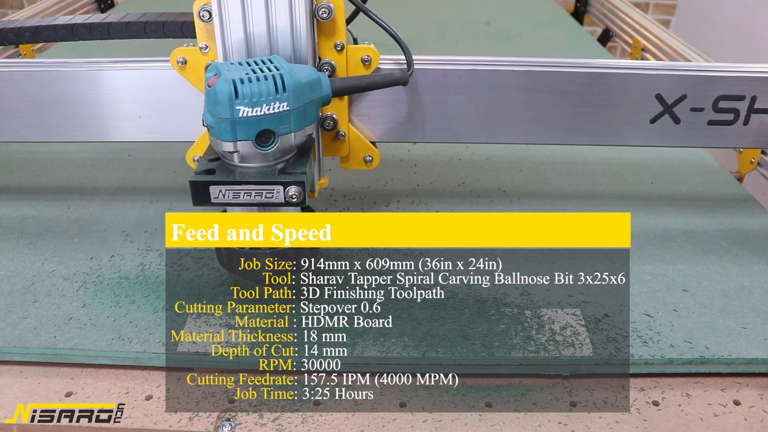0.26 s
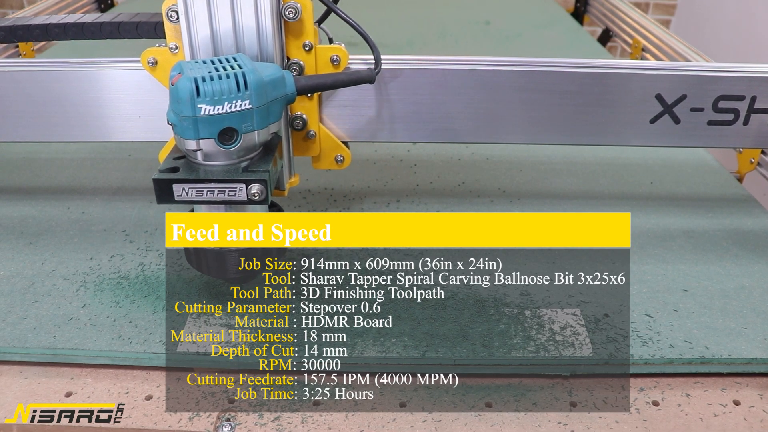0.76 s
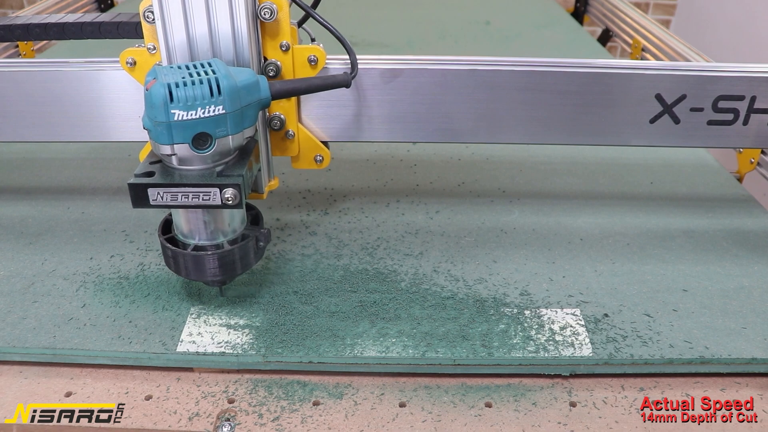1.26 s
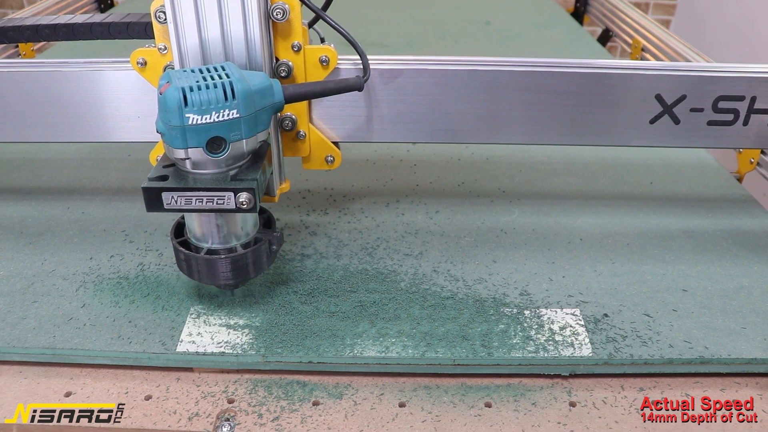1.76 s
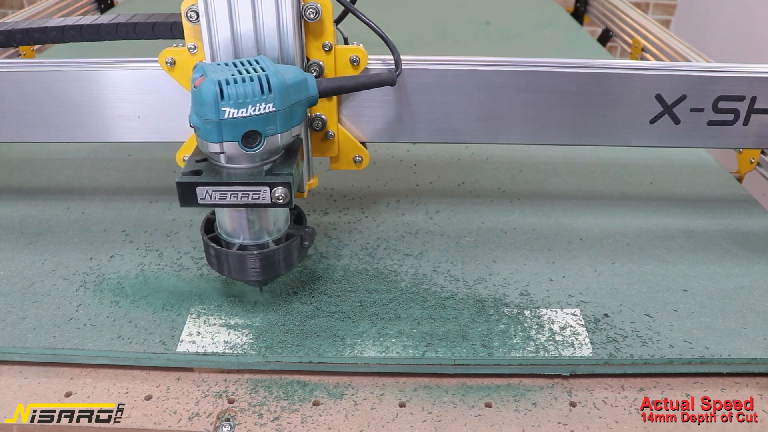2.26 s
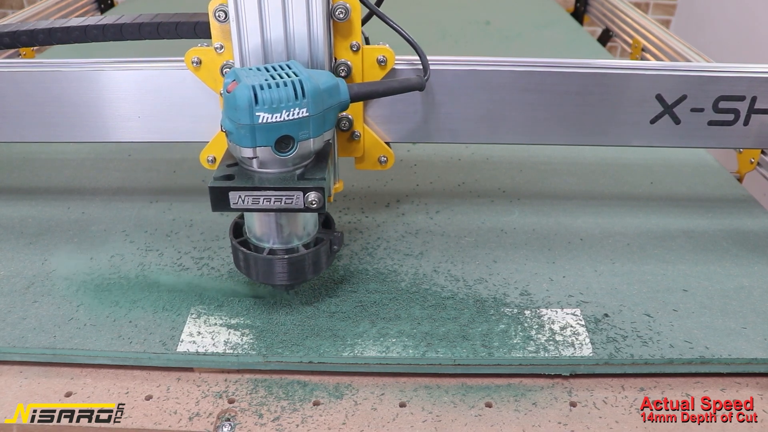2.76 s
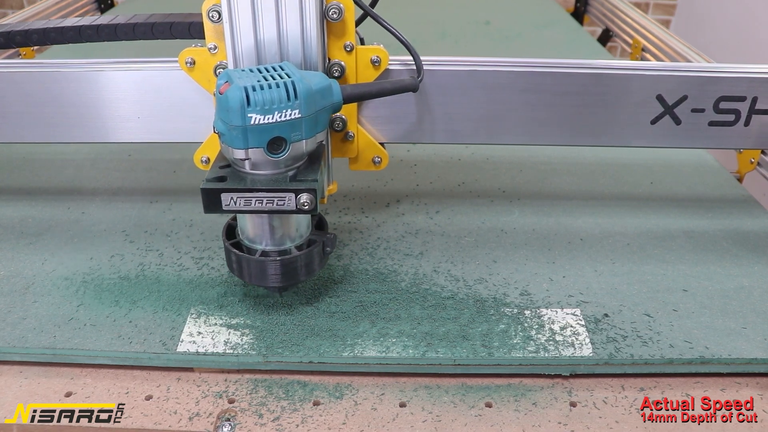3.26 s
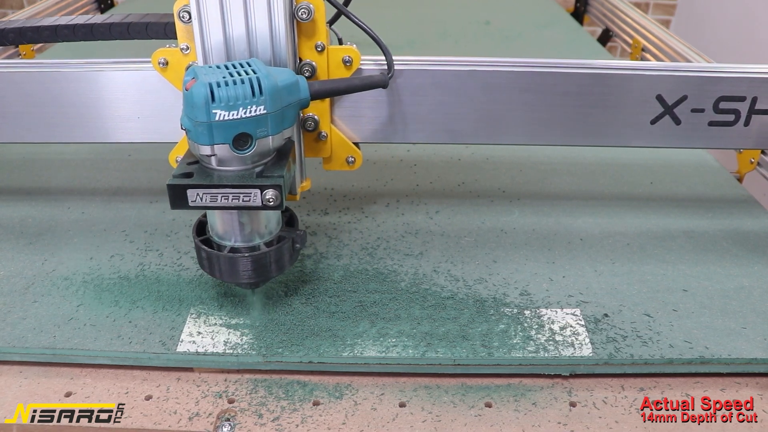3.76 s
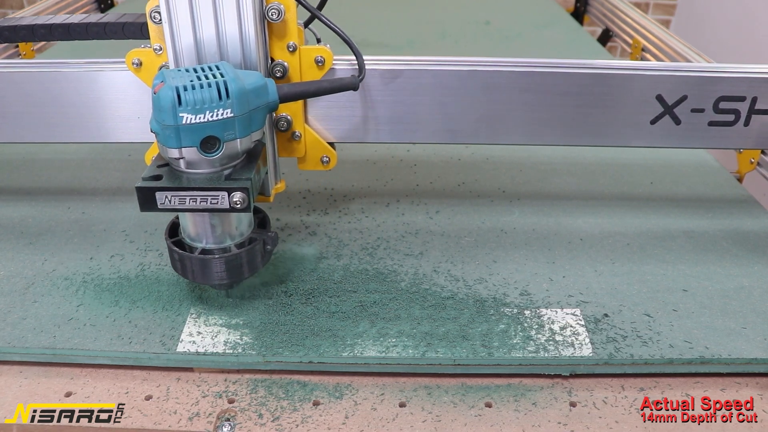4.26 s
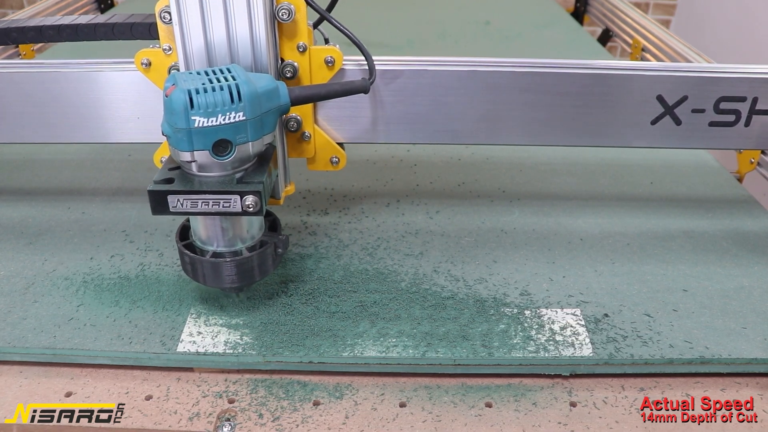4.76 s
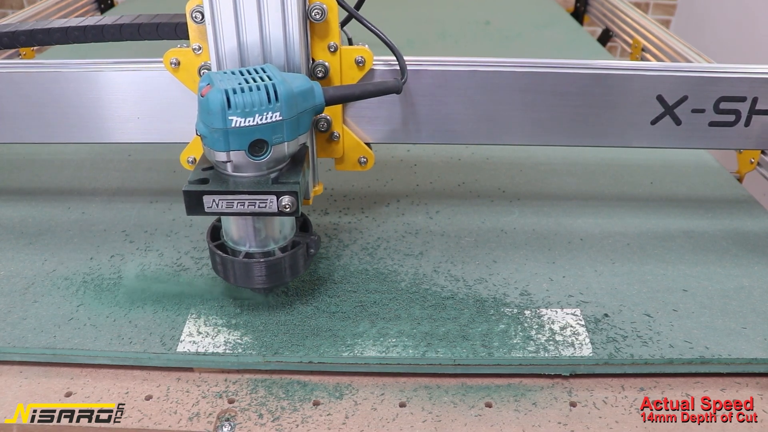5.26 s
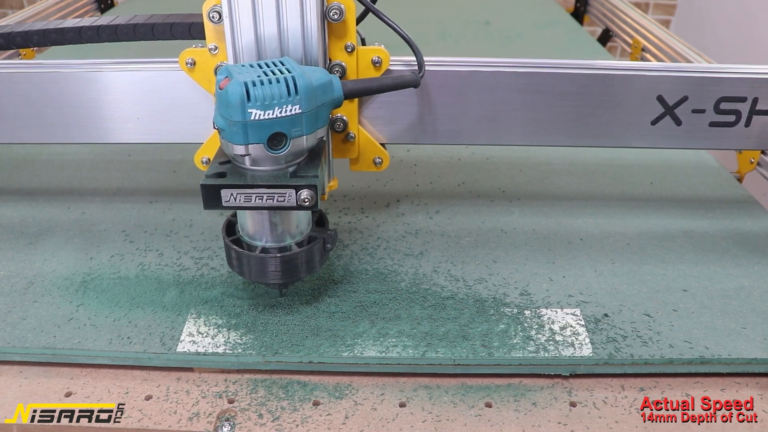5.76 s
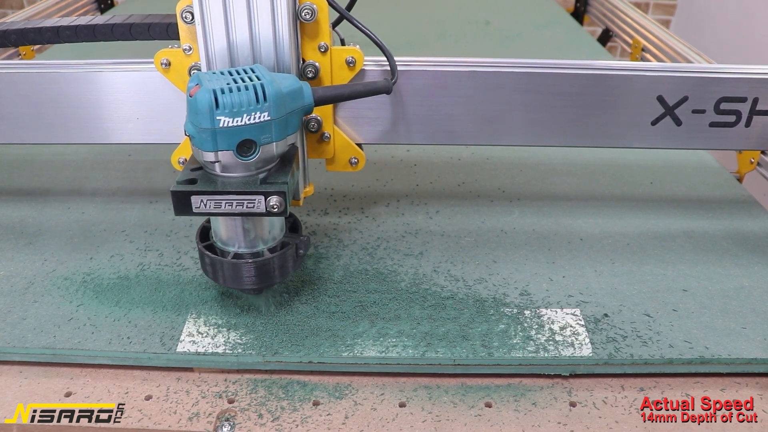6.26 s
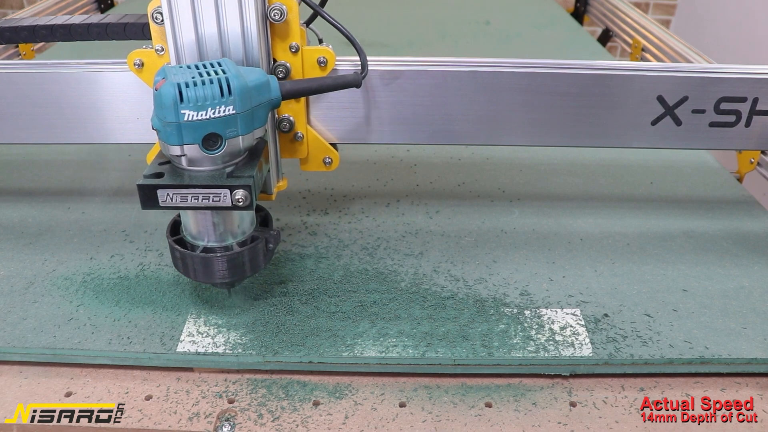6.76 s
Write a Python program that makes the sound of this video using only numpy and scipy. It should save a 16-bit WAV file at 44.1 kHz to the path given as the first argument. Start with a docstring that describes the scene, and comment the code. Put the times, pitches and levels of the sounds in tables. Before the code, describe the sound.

A small electric router on a gantry is already at full speed at 0 s, carving fibreboard continuously until the end at about 7 s. The dominant sound is a steady, hard whine built on a buzzing tone near 490 Hz with strong overtones, slightly rough and fluttering. Its pitch wavers by a few percent: rising around 1.3 s, dipping near 3.4 s, lifting around 4.4 s, sagging near 6.3 s and peaking again about 6.7 s. Separate overtones swell and fade quickly and wander across the stereo image, as reflections change in the hard-walled workshop. Underneath is an unbroken rush of fan air and a bright, grainy hiss of chips, a little stronger near 0.2, 3.9 and 6.5 s, weaker near 1.5 and 4.7 s. Very faint low frame rumble shudders occasionally, and a barely perceptible lower hum comes and goes. Close pickup, no pause or stop.

```python
"""Trim router on a gantry

A trim router on a gantry carves a relief in fibreboard in a hard-walled workshop.
The spindle whines on multiples (orders) of its turning rate, which sags under load; each order swells and
fades as the moving tool shifts through the room's reflections. Filtered noise makes the hiss of fan air and
chips and a faint gantry rumble; a weak tone at half the turning rate comes and goes."""
import sys
import numpy as np
from scipy import signal
from scipy.fft import rfft, irfft, next_fast_len
from scipy.io import wavfile

SR = 44100
rng = np.random.default_rng(int(sys.argv[2]) if len(sys.argv) > 2 else 0)


def master_out(mix):
    """Clip the mix to full scale and print it as 16-bit PCM to the path in sys.argv[1]."""
    frames = np.transpose(np.atleast_2d(mix))
    ceiling = np.clip(frames, -1, 1)
    pcm = np.round(ceiling * 32767).astype(np.int16)
    wavfile.write(sys.argv[1], SR, pcm)


N = 309141

PORT_LAG_S = 4.5e-5   # delay at the right port of the sound both ports share

# Spindle orders with listed swells. Each row: multiple of the turning rate, level in dB of the part
# opposite in sign at the two ports (before its scatter), flutter depth as a fraction of the amplitude.
SIDE_ORDERS = [(1, -65.5, 0.18), (2, -54, 0.27), (3, -54.5, 0.33), (4, -57, 0.58), (5, -52, 0.51),
               (6, -53, 0.68), (8, -54, 0.39), (7, -58, 0.63), (10, -66, 0.77), (11, -65, 0.5),
               (12, -55.5, 0.79)]


def from_db(db):
    """Decibels are logarithmic: 20 dB is a tenfold amplitude."""
    return 10 ** (np.asarray(db) / 20)


def rms_one(x):
    """Mean power sets level: scales a signal to an rms of 1."""
    return x / np.sqrt(np.mean(np.abs(x) ** 2) + 1e-20)


def in_time(rows):
    """Linear interpolation in time: the columns of a table, one value a sample."""
    s, *columns = np.transpose(rows)
    return [np.interp(np.arange(N) / SR, s, column) for column in columns]


def at_hz(points, hz):
    """Pitch is logarithmic in frequency: reads a spectrum on a log-frequency axis."""
    point_hz, values = np.array(points).T
    return np.interp(np.log(hz), np.log(point_hz), values)


def bump(at_s, spread_s):
    """Gaussian pulse: a smooth rise and fall around one moment, height 1, standard deviation spread_s."""
    t = np.arange(N) / SR
    return np.exp(-.5 * ((t - at_s) / spread_s) ** 2)


def drift(rate_hz):
    """Low-passed noise wanders slowly: two equal poles at rate_hz, rms 1."""
    step = 40                                  # samples between coarse values
    pole = np.exp(-2 * np.pi * rate_hz * step / SR)
    coarse = rng.standard_normal(N // step + 2002)
    slow = signal.lfilter([1], [1, -2 * pole, pole * pole], coarse)[2000:]   # drop the run-in
    return np.interp(np.arange(N) / step, np.arange(len(slow)), rms_one(slow))


def scatter(rate_hz):
    """The sum of many reflections is complex Gaussian: a wandering strength and phase, power 1."""
    return (drift(rate_hz) + 1j * drift(rate_hz)) / np.sqrt(2)


def hiss(spectrum, patchy_db, flicker_hz):
    """Partial coherence: noise partly shared by the two ports, flickering in octave bands; rms 1."""
    # Each row: frequency in Hz, share of the noise power common to both ports, 0 to 1.
    likeness = [(60, 0.98), (500, 1), (680, 0.75), (1300, 0.77), (1800, 0.31), (3100, 0.49), (7000, 0.42),
                (15000, 0.32)]
    size = next_fast_len(N)
    hz = np.maximum(np.arange(size // 2 + 1) * SR / size, 1)
    shared, left, right = rfft(rng.standard_normal((3, size)))
    alike = np.clip(at_hz(likeness, hz), 0, 1)
    late = shared * np.exp(-2j * np.pi * hz * PORT_LAG_S)
    common = np.sqrt(alike) * np.array([shared, late])
    separate = np.sqrt(1 - alike) * np.array([left, right])
    pair = (common + separate) * from_db(at_hz(spectrum, hz))

    out = 0
    together = drift(flicker_hz)
    for octave in range(4, 15):
        share = np.clip(1 - np.abs(np.log2(hz) - octave), 0, 1)   # overlapping bands that add up to one
        band = irfft(pair * share, size)[:, :N]
        flicker_db = patchy_db * (0.77 * together + drift(flicker_hz))
        out = out + band * from_db(flicker_db)
    return rms_one(out)


def turning_angle():
    """Phase is the running integral of rate: the spindle's angle in radians as it sags and runs up."""
    # Spindle speed, sagging under load and rising when the cut eases.
    # Each row: time in seconds, speed in turns per second.
    spindle = [(0.0, 482), (0.03, 482.7), (0.11, 488.4), (0.31, 493.5), (0.8, 491), (1.16, 486.5),
               (1.27, 495.8), (1.32, 497.6), (1.45, 496.7), (1.61, 491.9), (1.9, 489.8), (2.14, 493),
               (2.64, 490.6), (2.91, 496.5), (3.13, 490.6), (3.24, 490.4), (3.41, 482.2), (3.44, 482.8),
               (3.5, 487.5), (3.73, 493.1), (4.18, 486.9), (4.22, 488.3), (4.36, 498.3), (4.4, 499),
               (4.53, 496.7), (4.69, 491.5), (4.83, 493.1), (4.96, 488.9), (5.16, 491.7), (5.38, 491.9),
               (5.61, 496.6), (5.8, 490.9), (6.01, 491.7), (6.26, 482.2), (6.61, 492.9), (6.72, 499.6),
               (6.88, 494.3), (7.01, 494.8)]
    speed, = in_time(spindle)
    return 2 * np.pi * np.cumsum(speed + 0.25 * drift(13.6)) / SR


def order_levels():
    """Interference varies level: each order with listed swells wanders about its usual dB, swells or fades."""
    # Usual level of each of these orders before its wander, in dB rms, in the sequence of SIDE_ORDERS.
    usual_levels = [-48, -48, -45, -49.5, -53.5, -55.5, -58, -60, -61.5, -69, -62]
    # Passing swells and fades of one order. Each row: centre in seconds, multiple of the turning rate,
    # standard deviation of the pulse in seconds, change at its centre in dB.
    swells = [(0.0, 2, 0.07, -5), (0.04, 1, 0.033, -8.5), (0.09, 4, 0.015, -12), (0.133, 7, 0.12, 6.8),
              (0.306, 2, 0.022, -16), (0.307, 11, 0.115, 13), (0.334, 4, 0.052, 4.5), (0.45, 12, 0.118, 8),
              (0.533, 4, 0.22, 3.5), (0.6, 8, 0.29, 4.5), (0.642, 12, 0.087, -3), (0.668, 1, 0.21, -5.5),
              (0.675, 4, 0.03, -16), (0.766, 6, 0.16, -9), (0.775, 11, 0.073, 8), (0.808, 3, 0.075, -10),
              (0.818, 5, 0.036, 7.5), (0.9, 10, 0.266, 3.5), (0.946, 3, 0.035, 4.0), (0.995, 4, 0.077, 5.5),
              (0.998, 7, 0.076, -11), (1.171, 8, 0.14, -9), (1.183, 3, 0.013, -10.0),
              (1.187, 2, 0.0091, -4), (1.2, 5, 0.057, 3.5), (1.206, 1, 0.028, 2.5), (1.27, 3, 0.1, -12.5),
              (1.275, 2, 0.0073, -7), (1.436, 11, 0.035, 15), (1.456, 5, 0.2, 4), (1.465, 1, 0.034, -7.9),
              (1.469, 3, 0.054, 7), (1.549, 11, 0.094, -5.0), (1.597, 4, 0.089, -8), (1.62, 1, 0.16, 1.5),
              (1.63, 8, 0.023, 9), (1.672, 2, 0.013, -24), (1.693, 12, 0.042, -12), (1.767, 8, 0.028, 11),
              (1.783, 12, 0.053, 6), (1.8, 11, 0.032, 6), (2.03, 7, 0.024, 7), (2.069, 4, 0.047, -6.0),
              (2.158, 7, 0.467, -8), (2.168, 10, 0.056, -1), (2.218, 11, 0.058, 4), (2.221, 4, 0.058, 5.7),
              (2.224, 3, 0.077, 5), (2.338, 5, 0.217, -8), (2.39, 6, 0.1, 7), (2.403, 11, 0.049, -6),
              (2.5, 11, 0.029, 10), (2.57, 6, 0.059, -8), (2.585, 2, 0.11, 6.5), (2.593, 10, 0.12, -5),
              (2.65, 1, 0.29, 2), (2.671, 4, 0.48, -7), (2.774, 5, 0.029, -9.4), (2.869, 2, 0.055, -12),
              (2.903, 12, 0.029, -9), (2.916, 5, 0.093, 7.5), (2.943, 6, 0.041, -10),
              (2.951, 10, 0.029, -7.7), (2.997, 1, 0.053, -5), (3.077, 12, 0.058, 10),
              (3.087, 3, 0.23, 3.5), (3.153, 11, 0.048, -7.7), (3.18, 12, 0.045, -9.2),
              (3.187, 2, 0.081, 4.4), (3.191, 8, 0.074, 11.3), (3.256, 6, 0.046, -9), (3.27, 7, 0.108, -10),
              (3.3, 4, 0.032, 10.5), (3.324, 2, 0.036, -13), (3.343, 7, 0.036, 9), (3.417, 1, 0.34, -4.5),
              (3.426, 3, 0.0096, -10.8), (3.56, 7, 0.37, 6), (3.618, 6, 0.15, 6.7), (3.727, 11, 0.02, 9),
              (3.754, 4, 0.048, 6.3), (3.769, 8, 0.061, -7.9), (3.801, 11, 0.192, -9),
              (3.838, 10, 0.027, 5), (3.84, 12, 0.028, -7.1), (3.9, 4, 0.09, -9), (3.947, 8, 0.026, 8),
              (4.0, 7, 0.084, -10), (4.075, 4, 0.033, 5.5), (4.093, 3, 0.21, -6), (4.137, 6, 0.034, -11),
              (4.196, 8, 0.034, -12), (4.239, 2, 0.014, -9.1), (4.32, 2, 0.009, -15), (4.39, 3, 0.07, -6),
              (4.394, 11, 0.036, 16), (4.426, 10, 0.019, 9.3), (4.44, 5, 0.31, 4), (4.544, 1, 0.034, -10),
              (4.554, 3, 0.1, 5.5), (4.606, 4, 0.066, -14), (4.696, 11, 0.102, -9),
              (4.775, 3, 0.021, -10.5), (4.783, 2, 0.034, -15), (4.995, 5, 0.12, -10), (5.103, 4, 0.033, 8),
              (5.19, 2, 0.83, 2), (5.187, 3, 0.016, -8.0), (5.2, 7, 0.329, -7), (5.27, 6, 0.096, 4.5),
              (5.338, 11, 0.13, 13), (5.353, 10, 0.27, -7), (5.38, 1, 0.16, 4.5), (5.4, 4, 0.47, -8),
              (5.563, 2, 0.1, -11), (5.647, 12, 0.045, -16), (5.684, 3, 0.17, 3.2), (5.69, 5, 0.2, 7),
              (5.721, 8, 0.072, -12), (5.918, 11, 0.08, 11), (5.933, 8, 0.2, 8), (5.956, 2, 0.105, 5),
              (5.97, 12, 0.32, 8.9), (5.997, 7, 0.076, -10), (6.007, 12, 0.088, -10.9), (6.07, 5, 0.1, -12),
              (6.117, 3, 0.026, 11), (6.122, 2, 0.018, -22), (6.14, 11, 0.02, 9), (6.256, 1, 0.013, -8.0),
              (6.263, 4, 0.066, 4.6), (6.305, 3, 0.122, -4.5), (6.32, 7, 0.252, 5), (6.346, 1, 0.142, -10),
              (6.38, 2, 0.015, -11), (6.45, 2, 0.27, -4.5), (6.595, 2, 0.042, -13), (6.63, 1, 0.15, 4.1),
              (6.694, 3, 0.1, -7.5), (6.747, 12, 0.072, -7.6), (6.773, 2, 0.042, 6.5),
              (6.82, 5, 0.032, 8.8), (6.87, 1, 0.021, -20), (6.931, 4, 0.053, -19)]
    levels = []
    for usual_db, (k, *_) in zip(usual_levels, SIDE_ORDERS):
        moments_db = sum(db * bump(s, spread_s) for s, order, spread_s, db in swells if order == k)
        wander_db = 1.0 * drift(13.2 * np.sqrt(k))   # faster for higher multiples
        levels.append(usual_db + moments_db + wander_db)
    return levels


def whine(turn, levels_db):
    """Periodic forcing: unbalance, flutes and fan blades give sines on multiples of the turning angle."""
    # Further orders, without listed swells: their level and phase wander at random.
    # Each row: multiple of the turning rate, level in dB before roughness and reflections scale it.
    further_orders = [(9, -64), (13, -60), (14, -61.5), (15, -73), (16, -71), (17, -67), (18, -71.5),
                      (20, -72)]
    out = np.zeros((2, N))
    for level_db, (k, side_db, flutter) in zip(levels_db, SIDE_ORDERS):
        path = rng.uniform(0, 2 * np.pi) + 0.74 * drift(0.31 * k)   # the changing path shifts the phase
        wave = np.sqrt(2) * np.exp(1j * (k * turn + path))
        chatter = 1 + flutter * scatter(6.8 * np.sqrt(k))           # the uneven bite roughens the tone
        side = from_db(side_db) * (.3j + scatter(0.64 * k))
        ports = from_db(level_db) + side * [[1], [-1]]
        out += np.real(wave * chatter * ports)

    for k, level_db in further_orders:
        wave = np.sqrt(2) * from_db(level_db) * np.exp(1j * k * turn)
        wave = wave * (1 + 0.5 * scatter(26.0))
        rate_hz = 0.42 * k   # short waves pass through the reflection pattern faster
        shared = 0.34 * (0.6 + scatter(rate_hz))
        late = np.exp(-2j * np.pi * k * 491 * PORT_LAG_S)   # lag as phase at 491 turns per second
        out[0] += np.real(wave * (shared + 0.77 * scatter(rate_hz)))
        out[1] += np.real(wave * (shared * late + 1.0 * scatter(rate_hz)))
    return out


def fan_air():
    """Turbulence is broadband: the fan's air is shaped noise with flickering bands."""
    # Each row: frequency in Hz, relative spectral level in dB per Hz.
    air_spectrum = [(25, -46), (120, -34.5), (250, -27.5), (400, -20), (620, -13), (900, -2.5), (1250, -9),
                    (1650, -3.5), (2050, 1.5), (3200, -5), (3800, -4), (5000, -10), (8000, -20.5),
                    (15700, -27)]
    return from_db(-43.5) * hiss(air_spectrum, patchy_db=0.99, flicker_hz=8.6)


def cutting(turn):
    """Amplitude modulation: chips tear off once a turn, and the motor's mains ripple shakes the bite."""
    # Depth of bite. Each row: time in seconds, cutting level in dB before the 6.5 dB lift below.
    bite = [(0.0, -51.5), (0.21, -47.5), (0.3, -51.5), (0.76, -49.5), (0.9, -49.5), (1.03, -53.5),
            (1.42, -51.5), (1.52, -57), (1.87, -49.5), (2.3, -50.5), (2.62, -53), (3.28, -53), (3.9, -49),
            (4.14, -52.5), (4.26, -50.5), (4.74, -57.5), (4.86, -51.5), (5.4, -52), (6.13, -54.5),
            (6.48, -47), (6.56, -51), (6.8, -49.5), (7.01, -55)]
    # Each row: frequency in Hz, relative spectral level in dB per Hz.
    chips = [(300, -34), (1000, -6.5), (3000, -7), (6000, -2), (8000, -5), (10000, -11), (12000, -17),
             (15700, -21)]
    bite_db, = in_time(bite)
    ripple = 0.06 * np.sin(2 * np.pi * 100 * np.arange(N) / SR)   # 100 Hz
    pulse = 1 + 0.06 * np.cos(turn) + ripple
    return from_db(bite_db + 6.5) * pulse * hiss(chips, patchy_db=0.97, flicker_hz=11.0)


def gantry_rumble():
    """Structural resonance favours low bands: the frame rumbles as it feeds, and shudders at moments."""
    # Each row: frequency in Hz, relative spectral level in dB per Hz.
    rumble = [(25, -25), (90, -9), (112, 4), (140, -10), (175, 4), (210, -5), (400, -45)]
    # Each row: centre in seconds, change at the centre from the steady rumble in dB.
    shudders = [(1.35, 7), (1.74, 4), (2.99, 9), (4.5, 6), (4.84, 7.5), (5.72, 9), (6.6, -1)]
    steady_db, shudder_spread_s = -85.5, 0.088
    rumble_db = steady_db + sum(db * bump(s, shudder_spread_s) for s, db in shudders)
    return from_db(rumble_db) * hiss(rumble, patchy_db=1.5, flicker_hz=5.9)


def half_order_tone(turn):
    """A subharmonic repeats every two turns: a faint sine at half the turning rate, in spells."""
    # Each row: start in seconds, end in seconds, level in dB rms before its wander.
    half_tone = [(0.724, 1.552, -81), (1.858, 2.6, -82), (3.918, 4.352, -79.5), (4.5, 4.749, -82),
                 (4.979, 5.55, -79), (6.35, 6.895, -83.5)]
    edge_s = 0.11   # linear fade, centred on each start and end
    t = np.arange(N) / SR
    spells = 0
    for start, end, db in half_tone:
        inside_s = np.minimum(t - start, end - t)
        spells = spells + from_db(db) * np.clip(inside_s / edge_s + .5, 0, 1)
    return np.sqrt(2) * spells * from_db(2.2 * drift(5.5)) * np.sin(turn / 2)


def scene():
    """Superposition: whine, fan air, chips, rumble and half-order tone add at the two ports."""
    turn = turning_angle()
    spindle_whine = whine(turn, order_levels())
    return spindle_whine + fan_air() + cutting(turn) + gantry_rumble() + half_order_tone(turn)


def record(dry):
    """Linear filtering: the ports differ a little in colour, and a steep low-pass cuts the top."""
    # Each row: frequency in Hz, left minus right level in dB.
    tilt = [(200, 0), (600, 1.5), (900, 1.5), (1500, 0.7), (2800, -2), (4000, 2.5), (5000, 0.6),
            (8000, 2.5), (11000, 0), (13500, -3), (15500, -4)]
    size = next_fast_len(N)
    hz = np.maximum(np.arange(size // 2 + 1) * SR / size, 1)
    port_db = at_hz(tilt, hz) * [[.5], [-.5]]   # half the difference to each side
    coloured = irfft(rfft(dry, size) * from_db(port_db), size)[:, :N]
    low_pass = signal.cheby2(16, 70, 15900, fs=SR, output="sos")   # 70 dB down from 15900 Hz up
    return signal.sosfilt(low_pass, coloured)


dry = scene()
out = record(dry)
master_out(out)
```